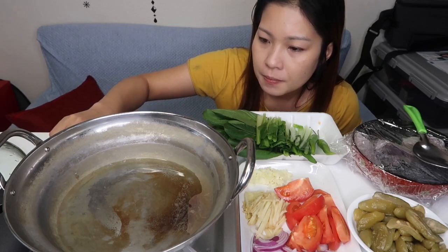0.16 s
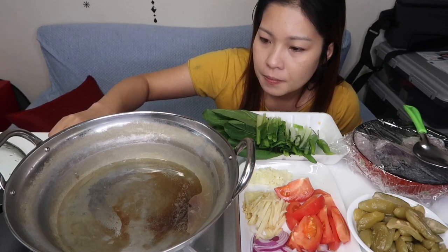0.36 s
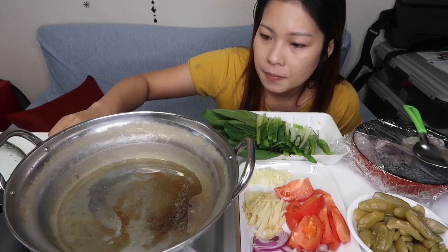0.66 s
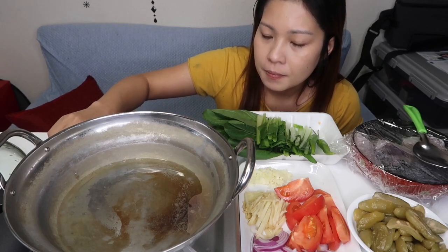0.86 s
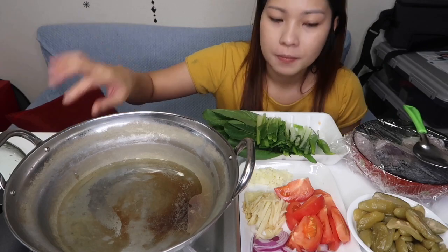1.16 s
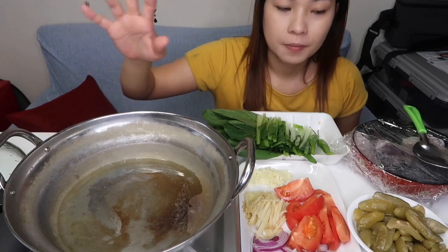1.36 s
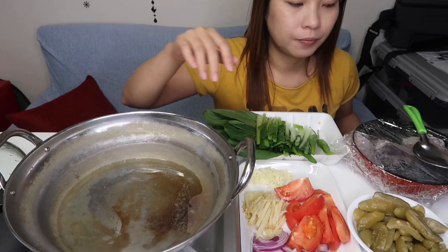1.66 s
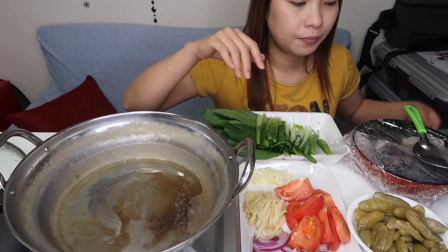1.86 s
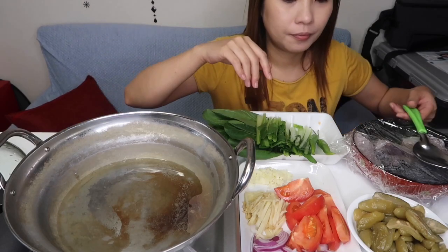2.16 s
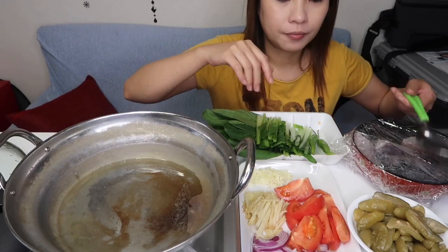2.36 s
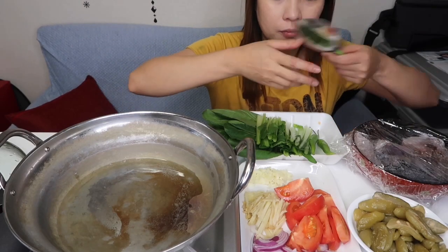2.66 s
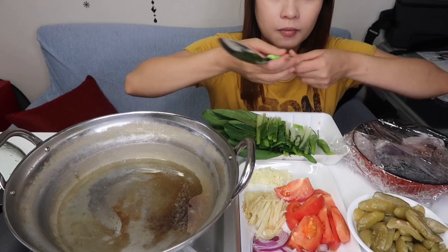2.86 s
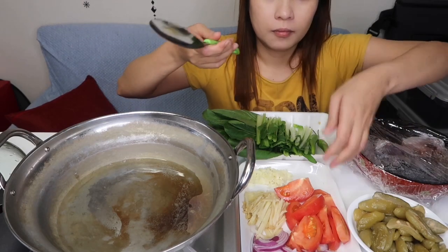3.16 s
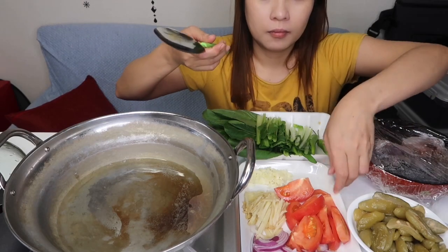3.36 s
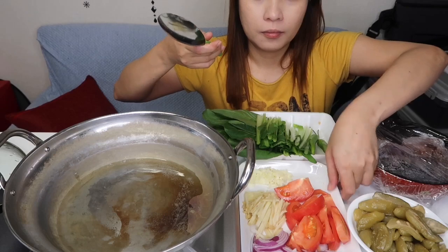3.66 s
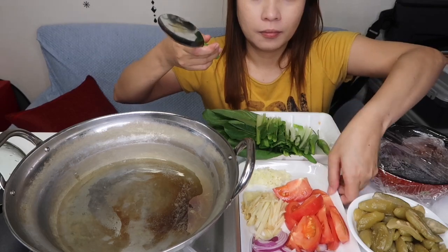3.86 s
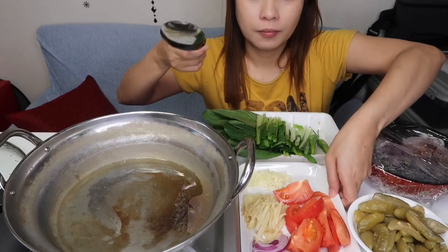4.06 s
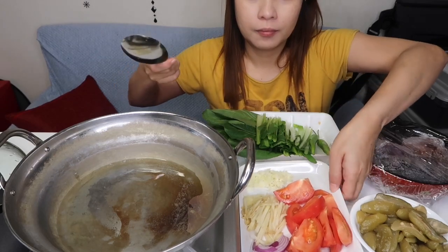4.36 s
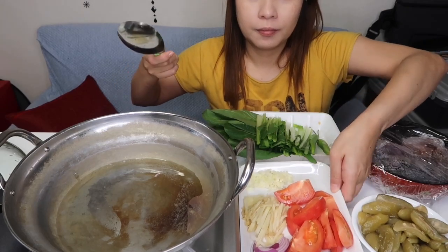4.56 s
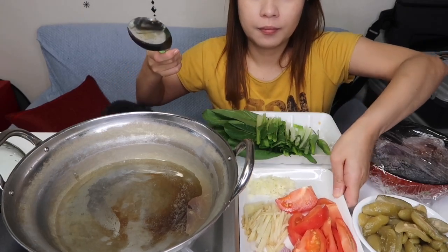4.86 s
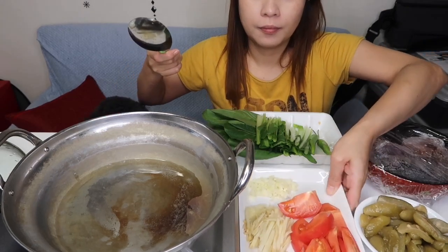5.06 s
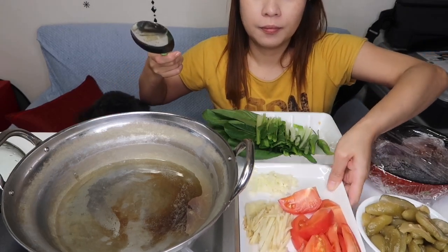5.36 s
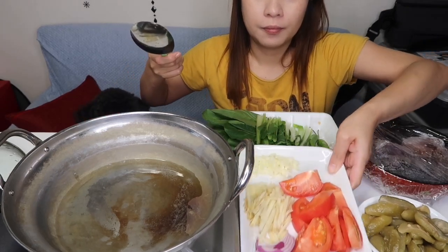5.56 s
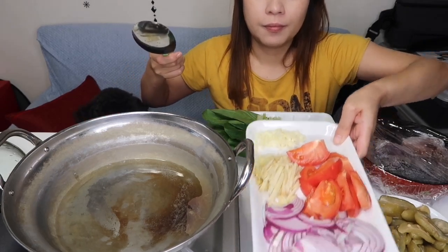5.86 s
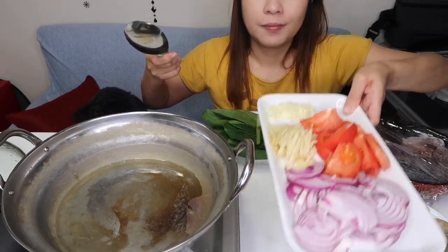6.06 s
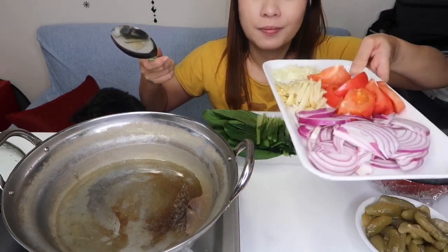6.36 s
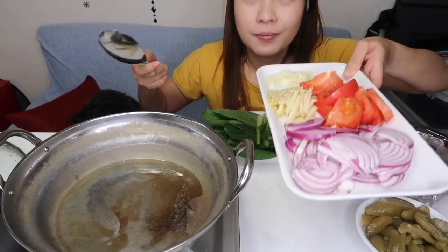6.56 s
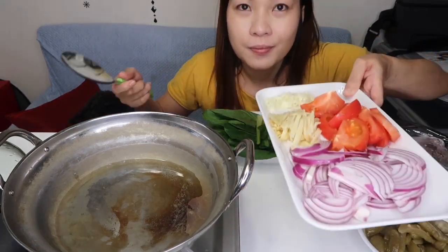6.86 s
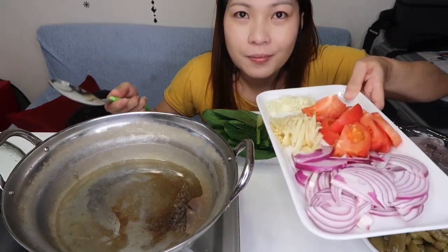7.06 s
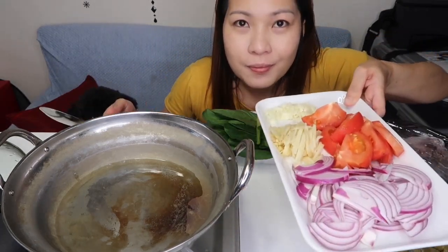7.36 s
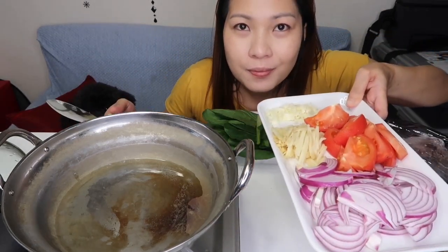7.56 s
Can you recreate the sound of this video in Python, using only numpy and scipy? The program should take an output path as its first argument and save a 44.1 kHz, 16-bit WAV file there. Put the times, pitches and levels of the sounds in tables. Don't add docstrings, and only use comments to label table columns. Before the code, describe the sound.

A small indoor room, heard close to the table in stereo, with low fan hum and soft air noise throughout. At 0.3 s a dry knob clicks. A faint wall clock beats every second from 0.5 s, tick and tock slightly different. At 1.1 s a platter softly nudges the table; near 2.3 to 2.45 s a ladle gives light taps. At 3.5 s a bowl lands with a dull, rocking knock. From 3.7 s muted tray knocks and light rubbing begin, with brighter rim knocks at 4.3 and 4.75 and a platter bump at 4.6. Around 5.1 s two heavy clinking bumps come with a scrape and rough squeak. A short higher squeak leads to the hardest table thump at 5.5 s. Gritty slides at 5.65 and 5.75 leave a steel pot ringing faintly. The background dips after the peaks, then recovers; clock beats at 6.5 and 7.5 end it.

```python
import sys
import numpy as np
from scipy import signal
from scipy.fft import rfft, irfft
from scipy.io import wavfile
from scipy.ndimage import uniform_filter1d

SR = 44100
rng = np.random.default_rng(int(sys.argv[2]) if len(sys.argv) > 2 else 0)


def rack_gain(trim_db):
    fader = np.asarray(trim_db, float)
    return 10 ** (fader / 20)


def unload_audio(sound):
    columns = np.transpose(np.atleast_2d(sound))
    steps = np.round(np.clip(columns, -1, 1) * 32767)
    wavfile.write(sys.argv[1], SR, steps.astype(np.int16))


N = 339570


def rms_one(x):
    return x / np.sqrt(np.mean(x ** 2) + 1e-20)


def coloured(x, points):
    hz, db = np.transpose(points)
    grid = np.fft.rfftfreq(len(x), 1 / SR) + 1
    gain = rack_gain(np.interp(np.log(grid), np.log(hz), db))
    return irfft(rfft(x) * gain, len(x))


def band(x, low_hz, high_hz, order=2):
    sos = signal.butter(order, [low_hz, high_hz], "band", fs=SR, output="sos")
    return signal.sosfilt(sos, x)


def ring(clicks, hz, t60):
    r, w = rack_gain(-60 / (t60 * SR)), 2 * np.pi * hz / SR
    return signal.lfilter([0, np.sin(w)], [1, -2 * r * np.cos(w), r * r], clicks + 1e-18)


def struck(hits, modes, spread_db=8.0):
    at = (np.array(hits)[:, 0] * SR).astype(int)
    db = np.array(hits)[:, 1]
    luck = rng.standard_normal((len(at), len(modes)))
    out = np.zeros(N)
    for (hz, level_db, t60), draw in zip(modes, luck.T):
        clicks = np.zeros(N)
        clicks[at] = rack_gain(db + level_db + spread_db * np.abs(draw)) * np.sign(draw)
        out += ring(clicks, hz, t60)
    return out


def knocks(events, modes, chatter_s, bounce_db, dense_db, shake_db, low_hz, gain_db, crack_db):
    held_t60_s = 0.024
    out, t = np.zeros(N), np.arange(SR // 5) / SR
    edges = [(low_hz, 750), (650, 1900), (1700, 4300)]   # thud, body, clink (Hz)
    for s, peak_db, weight_db, hard_db in events:
        parts_db = [weight_db, 0, hard_db, hard_db + crack_db]

        contact = np.zeros(len(t))
        after = np.arange(4) + rng.random(4) * [0.079, 0.5, 0.38, 0.492]
        contact[(after / 4 * chatter_s * SR).astype(int)] = rack_gain(bounce_db * np.arange(4))
        body = np.zeros(len(t))
        for k, (hz, db, t60) in enumerate(modes):
            body += ring(contact, hz, min(t60, held_t60_s)) * rack_gain(db) * (-1) ** k

        decay = np.exp(-t / (0.59 * chatter_s)) + rack_gain(shake_db - 60 * t / 0.2)
        crowd = rng.standard_normal(len(t)) * decay
        body += rack_gain(dense_db) * signal.lfilter([1], [1, -0.8], crowd)

        parts = [band(body, *e, order=3) for e in edges]
        parts.append(band(crowd, 3750, 7800, order=3))
        parts[0] += rack_gain(-16) * np.abs(parts[0]).max() * ring(contact, 160.4, 0.079)
        i = int(s * SR)
        for part, db in zip(parts, parts_db):
            part = part * np.clip(t / 0.0018, 0, 1)
            out[i:i + len(t)] += part / np.abs(part).max() * rack_gain(peak_db + gain_db + db)
    return out


# start_s, body level_db, weight_db (thud re body), hardness_db (clink re body)
BUMPS = [
    (1.062, -33.5, -8, -12.5),
    (4.562, -19.5, -18, -8.5),
    (4.59, -21.5, -1.5, -13),
    (5.114, -13, 4, 10),
    (5.154, -9, -9.5, 6.5),
]
# pitch_hz, level_db, t60_s
PLATTER = [(208, -11.5, 0.15), (353, 6, 0.1), (415, -8.5, 0.016), (564, 3, 0.013), (655, -3.5, 0.081),
           (1030, -15, 0.016), (1164, 8.5, 0.013), (1350, 4, .03), (1650, 7, 0.02), (2066, -1, 0.026),
           (2270, -2.5, 0.041), (2683, 5.5, 0.014), (3080, -0.5, 0.054), (3690, -20, 0.036)]


def platter_bumps():
    return knocks(BUMPS, PLATTER, chatter_s=0.008, bounce_db=-5.5, dense_db=-4.0, shake_db=-9,
                  low_hz=330, gain_db=-2.0, crack_db=-25)


# start_s, body level_db, weight_db (thud re body), hardness_db (clink re body)
HARD_BUMP = [
    (5.5175, 1.24, 0.6, -6),
]
# pitch_hz, level_db, t60_s
TABLETOP = [(347, 2.5, 0.031), (428, 0.5, 0.024), (547, -3, 0.021), (682, 0.5, 0.033), (905, 2.5, 0.029),
            (1104, 1, 0.032), (1395, -1.5, 0.013), (1600, -5.5, 0.029), (2080, 4.5, 0.02), (2820, 9, 0.013),
            (3610, -3, 0.012)]


def hard_bump():
    return knocks(HARD_BUMP, TABLETOP, chatter_s=0.008, bounce_db=-3.5, dense_db=-4.0, shake_db=-11.5,
                  low_hz=305, gain_db=0.51, crack_db=-26.5)


# start_s, body level_db, weight_db (thud re body), hardness_db (clink re body)
RIM_KNOCKS = [
    (4.339, -24, -8.5, 2),
    (4.748, -20.5, -6, 0),
    (4.816, -33, 0, -5),
]
# pitch_hz, level_db, t60_s
RIM = [(345, 8.5, 0.074), (480, -1, 0.053), (618, 3, 0.023), (930, -16, 0.039), (1226, 1, 0.07),
       (1470, -2, 0.018), (1840, 2, 0.018), (1940, -2.5, 0.046), (2480, 13, 0.012), (2720, -45, 0.038),
       (3770, -20, 0.018), (4150, 0, 0.02), (4600, -12, 0.016)]


def rim_knocks():
    return knocks(RIM_KNOCKS, RIM, chatter_s=0.00406, bounce_db=-5.5, dense_db=-6.0, shake_db=-8.0,
                  low_hz=304, gain_db=11, crack_db=-26.5)


# start_s, body level_db, weight_db (thud re body), hardness_db (clink re body)
TRAY_KNOCKS = [
    (3.74, -37.5, 2, -9),
    (3.966, -27, -6, -2.5),
    (4.104, -41.5, -6, -6),
    (4.294, -42, -7, -6),
    (4.495, -26, 2.5, -3.5),
    (4.923, -32.5, -4.5, -10),
    (4.969, -21, -10.5, -3.5),
]
# pitch_hz, level_db, t60_s
TRAY = [(196, -16, 0.02), (315, 0.5, 0.026), (498, 2, 0.034), (617, -0.5, 0.026), (780, -1, 0.018),
        (908, -3.5, 0.016), (1146, 0, 0.02), (1400, -5.5, 0.012), (1660, -5.5, 0.014), (2030, 1.5, 0.02),
        (2478, 4.5, 0.029), (2887, 3.5, 0.014), (3370, -6, .012), (3910, -15, 0.0088)]


def tray_knocks():
    return knocks(TRAY_KNOCKS, TRAY, chatter_s=0.012, bounce_db=-3, dense_db=-5, shake_db=-5.0,
                  low_hz=212, gain_db=6.5, crack_db=-24.5)


# start_s, body level_db, weight_db (thud re body), hardness_db (clink re body)
SET_DOWN = [
    (3.456, -11, -7, -9.5),
]
# pitch_hz, level_db, t60_s
BOWL = [(178, 4.5, 0.071), (320, 0, .04), (490, -8.5, 0.047), (610, 1.5, 0.04), (770, 3.5, 0.048),
        (1087, -4, 0.036), (1300, -7, .025), (1580, -13, 0.013), (2150, 9, 0.0075), (2790, 2, 0.015),
        (3630, -6, 0.017)]


def bowl_set_down():
    return knocks(SET_DOWN, BOWL, chatter_s=0.012, bounce_db=-2.0, dense_db=-2.5, shake_db=-12.5,
                  low_hz=127, gain_db=0.8, crack_db=-10.0)


# start_s, body level_db, weight_db (thud re body), hardness_db (clink re body)
LADLE_TAPS = [
    (2.297, -39.5, -13, -5),
    (2.439, -34.5, -16, 2),
    (2.4445, -23, -10, -6.5),
]
# pitch_hz, level_db, t60_s
LADLE = [(290, 1, .03), (570, 4, 0.033), (870, -1.5, 0.042), (1325, -4, .03), (1720, -10, .025),
         (2100, 5.5, 0.019), (2550, 1, 0.013), (3700, -5, 0.018), (4400, -7, 0.012)]


def ladle_taps():
    return knocks(LADLE_TAPS, LADLE, chatter_s=0.004, bounce_db=-10.5, dense_db=-9.5, shake_db=-10,
                  low_hz=222, gain_db=2.0, crack_db=-11.5)


def push(s, rise_s, fall_s, db):
    t = np.arange(0, N, 32) / SR - s
    return rack_gain(db - 20 * np.where(t < 0, -t / rise_s, t / fall_s))


# peak_s, rise_s (gains 20 dB), fall_s (loses 20 dB), level_db, weight_db
SLIDES = [(1.075, 0.06, 0.1, -43.5, 5.5), (4.02, 0.06, 0.02, -52, 11.5), (4.118, 0.16, 0.13, -51.5, 4.5),
          (4.274, .15, 0.1, -47, 7), (4.575, 0.05, .05, -37.5, 7), (4.596, 0.0551, .03, -37.5, 15),
          (4.64, .08, .12, -46, 4), (4.725, 0.06, 0.08, -38, 6), (4.99, 0.05, 0.03, -36, 3),
          (5.091, 0.0651, .08, -26, -12), (5.13, 0.06, .04, -23, 4), (5.187, 0.0744, .08, -28.5, 2),
          (5.24, 0.12, 0.1, -46, 13), (5.496, 0.08, 0.03, -25.5, 0), (5.42, .1, 0.13, -52.5, 13.5),
          (5.664, 0.09, .08, -30, -1.5), (5.75, 0.0668, .065, -27, -5), (4.87, .05, .06, -52, 6)]
SLIDE_COLOUR_DB = [-6, 0, -11, -52]
WEIGHT_SHARE = [1.0, 0.017, -0.0095, .3]
# peak_s, rise_s (gains 20 dB), fall_s (loses 20 dB), level_db
GLAZE_HISS = (5.155, 0.12, 0.1, -49)


def slides():
    grit = rack_gain(2.3 * np.minimum(rng.exponential(1, N), 5)) * rng.choice([-1, 1], N)
    grit = grit * (rng.random(N) < 2600 / SR)
    body = sum(ring(grit, hz, 0.021) * rack_gain(0.09 * db) for hz, db, t60 in PLATTER + TRAY)
    rub = rms_one(body) + 0.43 * rms_one(signal.lfilter([1], [1, -0.6], grit))

    pushes = np.array([push(*row[:4]) for row in SLIDES])
    weights_db = np.array(SLIDES)[:, 4]
    gains = [rack_gain(db + share * weights_db) @ pushes for db, share in zip(SLIDE_COLOUR_DB, WEIGHT_SHARE)]
    gains[3] = gains[3] + push(*GLAZE_HISS)

    out = np.zeros(N)
    edges = [(300, 900), (900, 3000), (2800, 5600), (6800, 13000)]
    for e, gain in zip(edges, gains):
        out += rms_one(band(rub, *e, order=3)) * gain.repeat(32)[:N]
    return rack_gain(-2.5) * out


# start_s, end_s, pitch_hz, width_hz, level_db
SQUEAKS = [
    (5.049, 5.1, 1060, 110, -34.5),
    (5.46, 5.498, 1275, 60, -33),
]


def squeaks():
    t, white, out = np.arange(N) / SR, rng.standard_normal(N), np.zeros(N)
    for start, end, hz, width_hz, db in SQUEAKS:
        swell = np.sin(np.pi * np.clip((t - start) / (end - start), 0, 1))
        out += rack_gain(db) * swell * rms_one(band(white, hz - width_hz / 2, hz + width_hz / 2))
    return out


# start_s, level_db
POT_NUDGES = [(1.062, -50.5), (4.235, -46.5), (4.34, -50), (4.265, -47), (5.63, -35.5), (5.72, -34),
              (5.765, -36)]
# pitch_hz, level_db, t60_s
POT = [(608.8, 1, 0.62), (653, -3, .4), (673.6, 0, .4), (1351, -18, .15), (2050, -14, .15)]


def pot():
    soft_contact = np.hanning(14) / 7
    return signal.fftconvolve(struck(POT_NUDGES, POT, spread_db=1.8), soft_contact)[:N]


# start_s, level_db
TICKS = [(.538, -57.5), (2.538, -57.5), (4.538, -51.5), (6.538, -55.5)]
TOCKS = [(1.538, -51), (3.538, -48.5), (7.538, -54.5)]
# delay_s, level_db
TICK = [(0, 11), (.005, 6), (.012, 15), (.017, 8), (.024, -1), (.031, -6), (.04, 10.5), (.05, -8)]
TOCK = [(0, 3), (.008, -4), (.022, 3), (.027, 11), (.031, 13.5), (.036, 8.5), (.044, -2), (.053, -6)]
# pitch_hz, level_db, t60_s
CASE = [(1450, 0, .012), (1900, -2, .008), (2300, 0, .011), (2900, -4, .007), (3500, -5, .007),
        (4300, -7, .005), (5200, -9, .005), (6400, -12, .004)]


def clock():
    hits = []
    for beats, train in ((TICKS, TICK), (TOCKS, TOCK)):
        for s, db in beats:
            hits += [(s + lag, db + click_db) for lag, click_db in train]
    return band(struck(hits, CASE, spread_db=3.5), 1240, 6300)


# start_s, level_db
SWITCH = [
    (0.2596, -23.5),
]
# pitch_hz, level_db, t60_s
KNOB = [(2070, 0, .03), (2400, -4, .015), (2760, -5, .015), (3400, -5, .015), (4100, -9, .01),
        (4800, -11, .008), (5700, -12, .008), (6600, -15, .006)]


def knob():
    return rack_gain(-8.5) * band(struck(SWITCH, KNOB, spread_db=0.6), 1900, 6800)


# pitch_hz, t60_s, level_db
ROOM = [(160.4, 0.32, 0.5), (500, 0.21, 2.5), (1580, 0.18, 2), (3780, 0.15, 2.5), (10600, 0.085, 3.5)]


def room(x):
    t, white = np.arange(SR // 2) / SR, rng.standard_normal(SR // 2)
    tail = np.zeros(len(t))
    for hz, t60, db in ROOM:
        tail += band(white, hz / 1.55, hz * 1.92) * rack_gain(db - 29 - 60 * t / t60)
    tail *= np.clip((t - 0.003) / 0.0064, 0, 1)
    return signal.fftconvolve(x, tail)[:N]


# pitch_hz, level_db
WIDTH = [(60, -21), (110, -35), (200, -9), (380, -14), (700, -24), (1290, -10.5), (2380, -9.5), (4400, 3.5),
         (8120, 13), (15000, 17)]


def stereo_difference(table, far):
    return coloured(-0.06 * (table + far) + 0.85 * room(table + 0.65 * far), WIDTH)


# pitch_hz, level_db (per Hz)
AIR = [(12, 7), (20, -23), (53, 1), (80, -4), (111, -0.5), (147, -6.5), (217, -22), (242, -17), (319, -6.5),
       (421, -14), (656, -16), (774, -15), (3760, -27.5), (12700, -47.5), (15000, -90)]
# pitch_hz, level_db (per Hz)
AIR_SIDE = [(12, -60), (20, -87), (74, -15), (89, -32), (111, -11), (457, -4), (540, -10.5), (1550, -13.5),
            (8620, -29), (12700, -32.5), (15000, -47)]
# pitch_hz, width_hz, level_db
HUM = [(37.3, 9.5, -59.5), (213.3, 17, -58), (329, 21, -61.5), (663, 54, -64.5)]
# pitch_hz, wander_hz, level_db
WHINE = [(109.5, 4.24, -54), (13006, 9, -87)]


def room_tone():
    air_db, air_side_db = -45, -59
    white = rng.standard_normal((4, N))
    mid = rack_gain(air_db - 4.0) * rms_one(coloured(white[0], AIR))
    for hz, width_hz, db in HUM:
        t60 = 1.76 / width_hz
        mid += rack_gain(db) * rms_one(ring(ring(white[1], hz, t60), hz, t60))
    wander = rms_one(uniform_filter1d(uniform_filter1d(white[3], size=4000), size=4000))
    for hz, wander_hz, db in WHINE:
        mid += rack_gain(db + 1.5) * np.sin(2 * np.pi * np.cumsum(hz + wander_hz * wander) / SR)
    side = rack_gain(air_side_db) * rms_one(coloured(white[2], AIR_SIDE))
    return mid, side


def scene():
    table = platter_bumps() + hard_bump() + rim_knocks() + tray_knocks() + bowl_set_down() + ladle_taps()
    table = band(table + slides() + squeaks(), 110, 18000)
    far = clock() + knob()
    mid = table + room(table) + pot() + 0.5 * far + rack_gain(2) * room(far)
    side = stereo_difference(table, far)
    air_mid, air_side = room_tone()
    return (mid + air_mid) + (side + air_side) * [[1], [-1]]


def low_pass(x):
    return signal.sosfilt(signal.butter(12, 15660, fs=SR, output="sos"), x)


def record(dry):
    level_db = 20 * np.log10(uniform_filter1d(np.abs(dry).max(axis=0), size=441) + 1e-9)
    climb = 6.0 * np.arange(N) / SR
    wanted_db = np.maximum(level_db + 22.0, 0) * 0.42
    held_db = np.maximum.accumulate(wanted_db + climb) - climb
    r = np.exp(-1 / (0.018 * SR))
    ducked = dry * rack_gain(-signal.lfilter([1 - r], [1, -r], np.maximum(held_db, 0)))
    rounded = ducked / (1 + np.abs(ducked) ** 4) ** 0.25
    mix = np.clip(1.117 * rounded, -1, 1)
    return low_pass(mix)


dry = scene()
out = record(dry)
unload_audio(out)
```